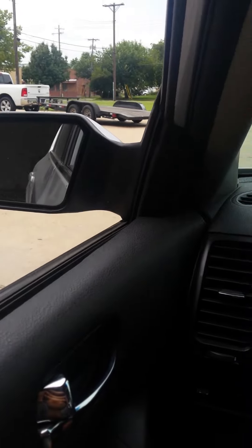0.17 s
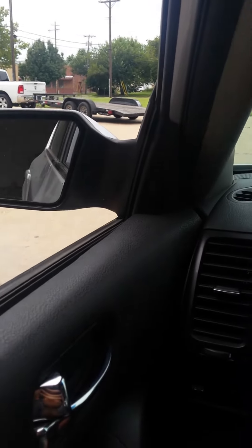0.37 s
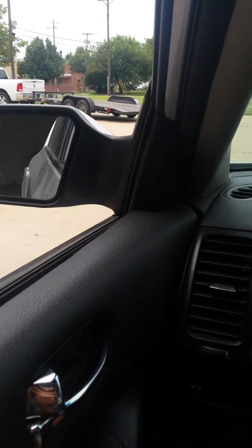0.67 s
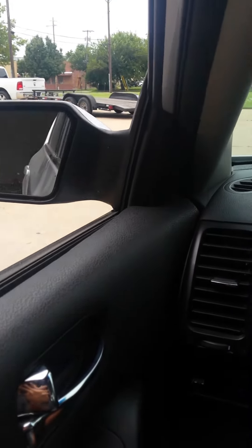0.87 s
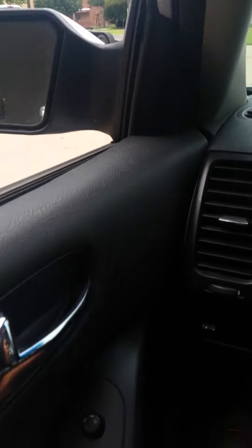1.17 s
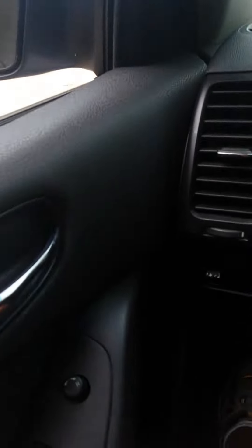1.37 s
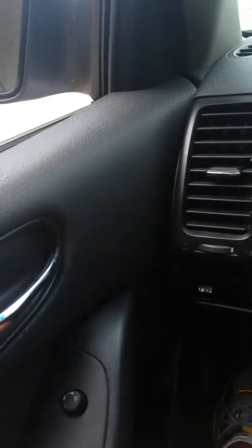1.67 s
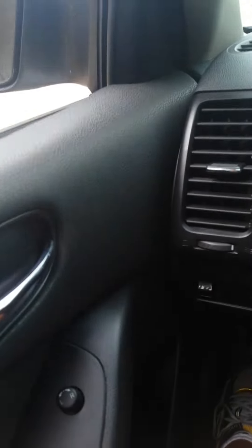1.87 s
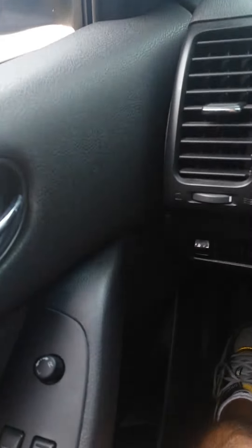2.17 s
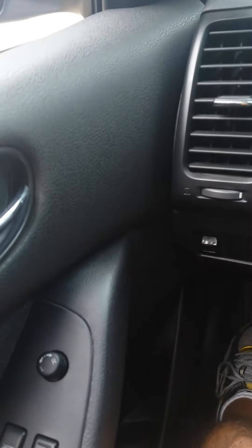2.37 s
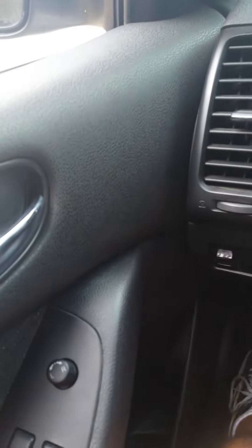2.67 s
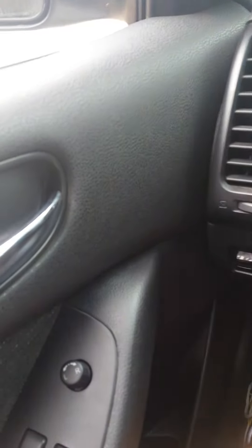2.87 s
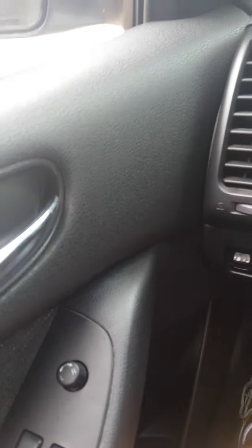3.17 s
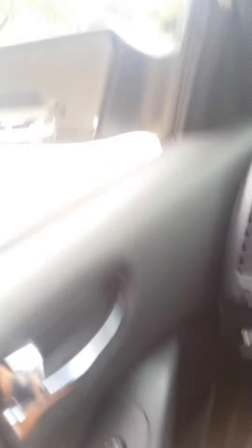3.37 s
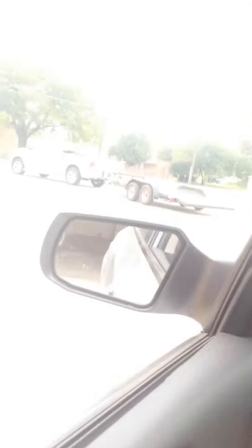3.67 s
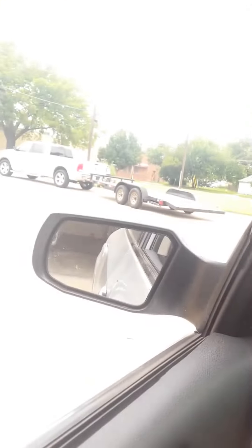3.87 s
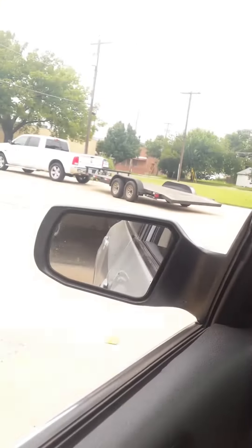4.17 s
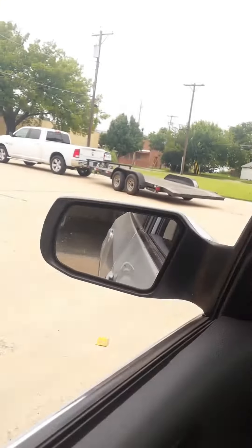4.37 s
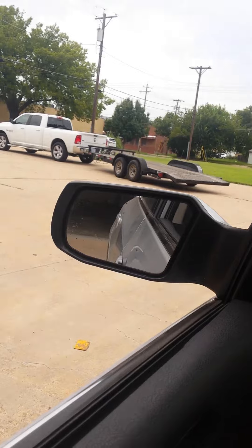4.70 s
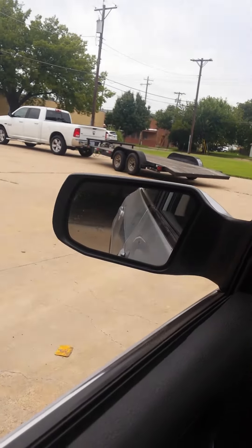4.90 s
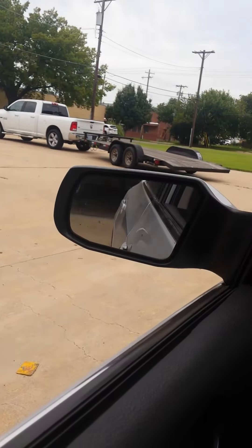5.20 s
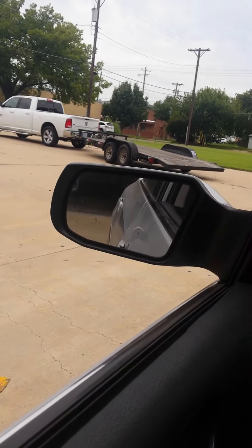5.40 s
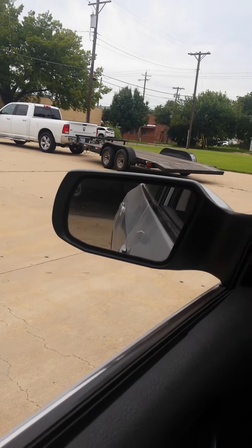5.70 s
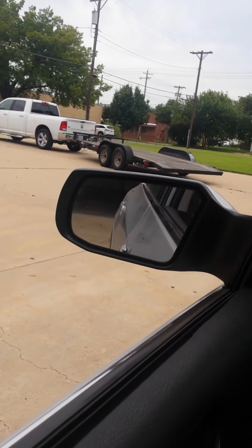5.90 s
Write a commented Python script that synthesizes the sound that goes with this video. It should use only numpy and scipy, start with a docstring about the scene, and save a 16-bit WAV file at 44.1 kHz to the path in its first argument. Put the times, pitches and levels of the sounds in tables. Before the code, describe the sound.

Inside a slowly rolling car by its open window, a low engine idle and dull tyre rumble run throughout with faint outside air. Two hard handling knocks come at once, close to the hand-held microphone, followed by small ticks. A tap, low thumps and stuttering brake chirps lead to a loud, thin, high squeal that pulses and wavers until the end.

```python
"""An engine idles and tyres rumble as a car creeps over concrete, heard from inside by the open window.
The hand-held phone knocks twice at the start and ticks now and then. Brakes chirp, low thumps pass, then two
discs squeal at close pitches, beating together and fading at each microphone port as the echoes shift.
Noise makes the rumble, hiss and scuffs; sine waves make the engine and brakes; fading rings make the knocks."""
import sys
import numpy as np
from scipy.fft import rfft, irfft, next_fast_len
from scipy.io import wavfile
from scipy.ndimage import map_coordinates

SR = 44100
rng = np.random.default_rng(int(sys.argv[2]) if len(sys.argv) > 2 else 0)


def unload_audio(sound):
    """Save the sound as a 16-bit wav file, at the path given as the first command line argument."""
    columns = np.transpose(np.atleast_2d(sound))
    # keep every value between -1 and 1, then stretch to whole-number steps
    steps = np.round(np.clip(columns, -1, 1) * 32767)
    wavfile.write(sys.argv[1], SR, steps.astype(np.int16))


N = 266584  # length in samples
TIME_S = np.arange(N) / SR


def amp(db):
    """Decibels to gain."""
    return 10 ** (np.asarray(db) / 20)


def unit(x):
    """Scale to rms 1."""
    return x / np.sqrt(np.mean(x ** 2) + 1e-20)


def along(points, hz):
    """Read a value between (Hz, value) points on a log frequency axis."""
    f, value = np.transpose(points)
    return np.interp(np.log(hz + 1), np.log(f + 1), value)


def curves(rows):
    """One value per sample for each column after the time."""
    s, *columns = np.transpose(rows)
    return [np.interp(TIME_S, s, column) for column in columns]


def wobble(rate):
    """A smooth random curve through `rate` random points a second."""
    points = rng.standard_normal(int(N * rate / SR) + 4)
    return map_coordinates(points, [np.arange(N) * rate / SR])


def wobbles(rate):
    """One random curve for each microphone port."""
    return np.array([wobble(rate), wobble(rate)])


def filtered(x, response):
    """Shape a sound by a gain (or complex gain) at each frequency."""
    m = next_fast_len(N + SR // 2)
    return irfft(rfft(x, m) * response(np.fft.rfftfreq(m, 1 / SR)), m)[..., :N]


def pan(db):
    """Left and right gains for a level difference."""
    return amp([[db / 2], [-db / 2]])


def cycle(hz):
    """Running phase of a pitch curve."""
    return 2 * np.pi * np.cumsum(hz) / SR


def swells(rows):
    """Bell-shaped swells of gain; length_s is the spread of each bell."""
    return sum(amp(db) * np.exp(-.5 * ((TIME_S - s) / length) ** 2) for s, db, length in rows)


# How alike noise is at the two ports: pitch_hz, likeness (1 = identical)
LIKENESS = [(40, .7), (150, .62), (600, .58), (1500, .35), (4000, .2), (12000, .1)]


def rush(spectrum):
    """Stereo noise of rms 1, more alike in the bass and more diffuse in the treble."""
    def mid_side_gains(hz):
        turn = np.arccos(np.clip(along(LIKENESS, hz), -1, 1)) / 2
        return amp(along(spectrum, hz)) * [np.cos(turn), np.sin(turn)]

    mid, side = filtered(rng.standard_normal((2, N)), mid_side_gains)
    return unit(np.array([mid + side, mid - side]))


# Engine over time: start_s, firing_rate_hz, level_db
ENGINE_IDLE = [(0, 26, -48), (.9, 30, -50), (1.25, 30, -49), (1.55, 26.2, -44), (2.3, 26.3, -42.5),
               (6.04, 26.4, -43.5)]
# Engine tones: multiple of the firing rate, relative_level_db
ENGINE_ORDERS = [(1, 0), (2, -3), (3, -8), (4, -5), (5, -1), (7, -10)]
# Steady tones of the fan and belt drive: pitch_hz, level_db
FAN_AND_BELT = [(380, -57.5), (984, -63.5), (1556, -89)]


def engine():
    """Multiples of the firing rate boom in the cabin; the fan and belts whine faintly."""
    hz, level_db = curves(ENGINE_IDLE)
    phase = cycle(hz + 0.16 * wobble(5.6))
    boom = 0
    for order, order_db in ENGINE_ORDERS:
        loudness = amp(level_db + order_db + 0.6 * wobble(3.1))
        start_phase = rng.uniform(0, 2 * np.pi)
        boom = boom + loudness * np.sin(order * phase + start_phase + 0.089 * wobbles(0.61))
    whine = 0
    for pitch_hz, whine_db in FAN_AND_BELT:
        tone = np.sin(cycle(pitch_hz * (1 + 0.004 * wobble(12))))
        whine = whine + amp(whine_db + 1.1 * wobbles(5.11)) * tone
    return np.sqrt(2) * (boom * pan(0.4) + whine)


# Tyre rumble over time: start_s, level_db
TYRE_LEVEL = [(0, -37), (1.3, -35.5), (1.7, -37), (2.3, -37.5), (2.85, -33.5), (3.2, -32), (3.5, -39),
              (4.2, -37), (6.04, -38.5)]
# Colour of the rumble: pitch_hz, relative_level_db (per Hz)
RUMBLE_COLOUR = [(20, -25), (40, -20), (52, -3), (70, -5.5), (95, 2.5), (120, -3), (190, -0.5), (240, -5),
                 (300, -4.5), (420, -14.5), (600, -16.5), (1000, -56.5), (2000, -26), (4000, -85)]
# Outside air, louder as the phone turns to the window: start_s, level_db
WINDOW_LEVEL = [(0, -43), (1.2, -43.5), (2.3, -44), (3.2, -44.5), (3.8, -42.5), (6.04, -42.5)]
# Colour of the outside air: pitch_hz, relative_level_db (per Hz)
AIR_COLOUR = [(200, -11.5), (450, -2), (700, -3), (1000, -7), (1500, -8.5), (2000, -16.5), (2600, -17),
              (4000, -20.5), (6500, -24.5), (9000, -25.5), (12000, -29.5), (14400, -29), (15600, -31)]


def road():
    """Tyres rumble through the car body as low noise; outside air hisses in at the window."""
    rumble = amp(curves(TYRE_LEVEL)[0] + 1.5 * wobble(17)) * rush(RUMBLE_COLOUR)
    air = amp(curves(WINDOW_LEVEL)[0]) * rush(AIR_COLOUR)
    return rumble + air


# The phone shifts in the hand: start_s, scuff_db, thud_db, scuff_t60_s (time for the scuff to fade 60 dB).
# Levels are before the slow rise, the chatter and the left-right balance.
GRIP_SHIFTS = [(0.078, -36.5, -54, .1), (0.083, -27, -21.5, 0.11), (0.0875, -17.5, -28.5, .03),
               (0.092, -16.5, -18, 0.057), (0.127, -41, -30, .06), (.153, -31, -24.5, 0.1),
               (.157, -22.5, -17.5, 0.074), (.167, -32, -18, 0.077), (0.188, -35, -18.5, 0.06),
               (.194, -36.5, -33, 0.06), (.468, -40, -59, 0.075), (1.34, -49, -57, .04),
               (1.81, -39, -53, 0.065), (2.24, -25, -27.5, 0.016), (4.287, -42, -56, .03)]
# Colour of the scuff: pitch_hz, relative_level_db (per Hz)
SCUFF_COLOUR = [(150, 10.5), (500, 3.5), (900, -3), (1700, 5), (2800, 0.5), (4200, 4), (6400, 3.5),
                (9000, -1), (13500, -13), (16000, -37)]
# Low tones of the thud: pitch_hz, relative_level_db, t60_s
THUD_TONES = [(122.4, 1.5, 0.14), (172.5, -1, 0.14), (236, -3.5, 0.068)]
# Ringing of the shell: pitch_hz, relative_level_db, t60_s when free
SHELL_TONES = [(844, -19, 0.055), (1347, 0, 0.074), (1547, 1, 0.078), (1960, -1.5, 0.052), (2790, -5, 0.1),
               (4350, -8, .08), (6130, 4, 0.065), (7130, -3, 0.055)]
CLACK_DB, FREE_RING_S = -12, 0.063  # level beside the scuff; in briefer contacts the finger damps the shell
CHATTER_DB, CHATTER_RATE = 3, 900  # loose case parts chatter: depth in dB, random points a second


def knocks():
    """Each shift of the grip scuffs the case, clacks its shell and thuds in it."""
    scuff, thud, clack = np.zeros(N), np.zeros(N), np.zeros(N)
    t = np.arange(SR // 4) / SR
    rise = 1 - np.exp(-t / 0.002)
    for s, scuff_db, thud_db, t60 in GRIP_SHIFTS:
        span = slice(round(s * SR), round(s * SR) + len(t))
        scuff[span] += rise * amp(scuff_db - 60 * t / t60)
        for hz, db, life in THUD_TONES:
            thud[span] += rise * amp(thud_db + db - 60 * t / life) * np.sin(2 * np.pi * hz * t)
        damped = min(t60 / FREE_RING_S, 1)
        for hz, db, life in SHELL_TONES:
            ring_db = scuff_db + CLACK_DB + db + rng.normal(0, 2.2) - 60 * t / (life * damped)
            clack[span] += rise * amp(ring_db) * np.sin(2 * np.pi * (hz * t + rng.random()))
    chatter = unit(amp(CHATTER_DB * wobble(CHATTER_RATE)))
    return (scuff * chatter * rush(SCUFF_COLOUR) + clack) * pan(6.2) + thud * pan(-0.49)


# Sharp ticks of the case: start_s, level_db (before a 12 dB lift and the case), left_minus_right_db
CASE_TICKS = [(0.0891, -1.5, 3.5), (.3691, -41, -1), (0.4716, -33, 15), (.475, -32, 4), (0.522, -36, 2),
              (0.839, -41, -7), (1.816, -36, -1), (2.034, -35.5, 3), (2.2404, -47, 2), (2.242, -15, 13)]
# Resonances of the plastic case: pitch_hz, width_hz, level_db
CASE_RESONANCES = [(810, 350, -14), (2470, 4500, -10.5), (6170, 990, 4), (11200, 2200, -15)]


def ticks(t60=0.0075, rattle_db=-9):
    """Tiny snaps, each with a brief noisy rattle, ring the resonances of the plastic case."""
    snaps, t = np.zeros((2, N)), np.arange(SR // 20) / SR
    for s, db, side_db in CASE_TICKS:
        snap = (t == 0) + amp(rattle_db - 60 * t / t60) * rng.standard_normal((2, len(t)))
        snaps[:, round(s * SR):][:, :len(t)] += amp(db + 12.0) * pan(side_db) * snap

    def case(f):
        peaks = sum(amp(db) * 1j * f * width / (centre ** 2 - f ** 2 + 1j * f * width)
                    for centre, width, db in CASE_RESONANCES)
        return peaks / (1 + (f / 13500) ** 8)  # dull the extreme treble

    return filtered(snaps, case)


def squeal(hz, jitter_hz, wander_hz):
    """Phase of a disc kept ringing by its pad's stick-slip; the uneven disc face shakes the pitch."""
    return cycle(hz + wander_hz * wobble(12) + jitter_hz * wobble(170))


def arch(start, end):
    """Gain of a rounded swell between two sharp nulls."""
    u = np.clip((TIME_S - start) / (end - start), 0, 1)
    return 4 * u * (1 - u)


def arches(rows):
    """The loudest swell at each moment, from start_s, end_s, level_db rows."""
    return np.max([amp(db) * arch(start, end) for start, end, db in rows], axis=0)


def at_ports(phase, lag, side_db, flutter_db):
    """A fluttering tone of rms about 1 with a lag (radians) and a level difference between the ports."""
    ports = amp([side_db / 2, -side_db / 2])
    balance = ports / np.sqrt(np.mean(ports ** 2, 0))
    tone = np.sin(phase + np.array([lag, -lag]) / 2)
    return np.sqrt(2) * amp(flutter_db * wobble(130)) * balance * tone


# Short chirps as the pads first touch: start_s, end_s, pitch_hz, level_db, octave_db (beside the note)
PAD_CHIRPS = [(1.028, 1.068, 1870, -42, -22), (1.055, 1.14, 1872, -52, -20), (2.715, 2.757, 1950, -45, -16),
              (2.747, 2.776, 1962, -38.5, -17), (2.774, 2.81, 1978, -36.5, -17),
              (2.81, 2.866, 1990, -36.5, -17), (2.867, 2.9, 1980, -44, -15), (2.9, 2.938, 1980, -43, -24),
              (2.94, 3.0, 1982, -46.5, -28), (2.99, 3.1, 1985, -48.5, -22), (3.14, 3.24, 1980, -53, -22)]


def chirps(lean_db=-1, drift_db=2):
    """A pad grazes its disc in a stutter of short notes, each with a fainter octave."""
    hz = curves([((start + end) / 2, pitch) for start, end, pitch, _, _ in PAD_CHIRPS])[0]
    phase = squeal(hz, jitter_hz=9, wander_hz=2)
    note = arches([(start, end, db) for start, end, _, db, _ in PAD_CHIRPS])
    octave = arches([(start, end, db + octave_db) for start, end, _, db, octave_db in PAD_CHIRPS])
    sound = 0
    for order, gain in ((1, note), (2, octave)):
        side_db = lean_db + drift_db * wobble(12)
        sound = sound + gain * at_ports(order * phase, .6 * wobble(7), side_db, flutter_db=1.2)
    return sound


# Gentle scrapes of the grip: centre_s, level_db, length_s
GRIP_RUBS = [(1.32, -55, 0.011), (1.344, -41.5, 0.0014), (1.37, -54.5, 0.034), (1.815, -43.5, 0.0026)]
# Colour of the scrapes: pitch_hz, relative_level_db (per Hz)
RUB_COLOUR = [(3000, -23), (9500, -16), (11600, -11), (13500, -21), (16000, -45.5)]


def rubs():
    """The grip scrapes gently: bright noise in short swells."""
    return swells(GRIP_RUBS) * rush(RUB_COLOUR)


# A firmer tap on the phone: start_s, level_db
FIRM_TAP = (2.2405, -33.5)
# Ringing of the phone's body: pitch_hz, relative_level_db, t60_s
BODY_TONES = [(660, 2, .04), (880, -6.5, .03), (970, 1.5, 0.039), (1550, -2, .025)]


def tap():
    """A fingertip lands on the phone and its body rings briefly."""
    s, tap_db = FIRM_TAP
    t = np.maximum(TIME_S - s, 0)
    return sum(amp(tap_db + db - 60 * t / t60) * np.sin(2 * np.pi * hz * t) for hz, db, t60 in BODY_TONES)


# Low thumps: centre_s, level_db (before the low-pass and the lean to the right), length_s
LOW_THUMPS = [(2.39, -34.5, 0.014), (2.475, -31, 0.016), (2.545, -29, 0.014), (2.755, -26, 0.03),
              (2.845, -28, 0.021), (2.905, -29, 0.023)]


def thumps():
    """A run of low thumps, mostly at the right port: rumble noise with its treble removed."""
    low_noise = filtered(rush(RUMBLE_COLOUR), lambda hz: 1 / (1 + (hz / 250) ** 4))
    return swells(LOW_THUMPS) * low_noise * pan(-20.5)


def echoed(phase, rate, direct):
    """A tone of rms about 1/sqrt(2), arriving directly and by shifting echoes, so it fades at each port."""
    in_step = (direct + wobbles(rate)) * np.sin(phase)
    out_of_step = wobbles(rate) * np.cos(phase)
    return (in_step + out_of_step) / np.sqrt(direct ** 2 + 2)


# A second brake, a little higher, that lets go again: start_s, pitch_hz
SECOND_GLIDE = [(2.95, 2060), (3.1, 2066), (3.28, 2092), (3.38, 2106), (3.46, 2133), (3.6, 2134),
                (3.73, 2127), (4.2, 2133), (4.46, 2131), (4.62, 2110), (4.85, 2132), (5.0, 2134),
                (5.2, 2160), (5.6, 2152)]
# Its strength before small trims: start_s, note_db, octave_db, left_minus_right_db
SECOND_STRENGTH = [(2.88, -66, -80, 3), (2.95, -50, -75, 3), (3.02, -45, -74, 1), (3.11, -52, -76, 1),
                   (3.15, -48, -76, 1), (3.27, -49, -74, 1), (3.35, -52, -74, 3), (3.42, -51, -70, 5),
                   (3.5, -33, -59, 7), (3.58, -29.5, -57, 7), (3.64, -35, -53, 7), (3.75, -35.5, -48, 7),
                   (3.85, -31.5, -53, 8), (3.92, -37, -53, 4), (3.97, -32, -53, 10), (4.08, -41, -54, 3),
                   (4.16, -32.5, -51, 3), (4.31, -43, -52, 1), (4.4, -39, -51, 1), (4.5, -35.5, -48, -2),
                   (4.6, -41, -50, 0), (4.74, -41, -59, 1), (4.82, -35, -53, 7), (4.93, -31.5, -56, 8),
                   (5.0, -36, -54, 3), (5.1, -32, -51, 4), (5.22, -38, -48.5, 0), (5.3, -41, -53, 0),
                   (5.38, -52, -58, 0), (5.45, -48, -55, -5), (5.55, -56, -64, 0), (6.04, -68, -72, 0)]
SECOND_THIRD_DB = -5.5  # its third harmonic beside its octave


def second_brake(note_db=-1.96, bright_db=-1):
    """A disc glides up to roughly 60 Hz above the main one, beats with it and fades."""
    hz = curves(SECOND_GLIDE)[0]
    level_db, octave_db, side_db = curves(SECOND_STRENGTH)
    phase = squeal(hz, jitter_hz=4, wander_hz=1.2)
    loudness = amp(level_db + note_db + 1.9 * wobble(30))
    note = loudness * at_ports(phase, .8 * wobble(14), side_db + 4 * wobble(26), flutter_db=.5)
    octave = echoed(2 * phase, rate=26, direct=1.1)
    third = amp(SECOND_THIRD_DB) * echoed(3 * phase, rate=26, direct=1.5)
    upper = np.sqrt(2) * (octave + third)
    started = TIME_S > SECOND_STRENGTH[0][0]
    return (note + amp(octave_db + bright_db) * upper) * started


# Highest overtones of a singing disc: multiple of the note, relative_level_db, left_minus_right_db
DISC_OVERTONES = [(4, 0.5, -5), (5, -2, -7), (6, -11, -3)]
GRAIN_DB = 2.0  # depth of their grain


def overtones(phase):
    """The upper overtones are grainy; shorter waves fade faster as the car moves."""
    sound = 0
    for order, db, lean_db in DISC_OVERTONES:
        grainy = amp(db + GRAIN_DB * wobble(190))
        sound = sound + grainy * pan(lean_db) * echoed(order * phase, rate=9 * order, direct=.6)
    return np.sqrt(2) * sound


# The brake that keeps singing: start_s, pitch_hz
MAIN_GLIDE = [(3.45, 2067), (3.7, 2065), (3.95, 2071), (4.25, 2065), (4.62, 2066), (5.0, 2074), (5.4, 2078),
              (5.56, 2071), (5.75, 2080), (5.9, 2072), (6.04, 2072)]
# Echoes also turn the note between the ports: start_s, right_port_lag_radians
PORT_TURN = [(3.6, .5), (3.66, 3.5), (3.79, 2.7), (3.84, .9), (4.03, .3), (4.07, 2.2), (4.12, 2.3),
             (4.138, 3), (4.17, -.9), (4.28, .1), (4.35, -1.4), (4.43, -.2), (4.48, 2.7), (4.56, .3),
             (4.7, -.9), (4.79, -1), (4.83, -3), (4.86, 0), (4.96, .6), (5.55, -.3), (6.0, .5)]
# Swells between the nulls where echoes cancel the note, before small trims: start_s, end_s, level_db
LEFT_NOTE = [(3.45, 3.68, -26.5), (3.68, 3.8, -33), (3.76, 3.9, -23.5), (3.89, 4.03, -22.5),
             (4.04, 4.297, -19), (4.293, 4.45, -23), (4.45, 4.6, -19), (4.56, 4.645, -23.5),
             (4.645, 4.72, -22.5), (4.73, 4.775, -33), (4.8, 4.87, -29), (4.84, 4.937, -16.5),
             (4.937, 5.04, -22.5), (5.04, 5.175, -25), (5.185, 5.257, -22), (5.257, 5.42, -23.5),
             (5.4, 5.51, -35), (5.505, 5.615, -22), (5.612, 5.76, -24.5), (5.73, 5.937, -22.5),
             (5.935, 6.018, -28), (6.012, 6.12, -25)]
RIGHT_NOTE = [(3.45, 3.63, -29.5), (3.61, 3.69, -37), (3.695, 3.815, -23), (3.815, 3.94, -28.5),
              (3.92, 4.1, -26), (4.01, 4.165, -22), (4.14, 4.33, -23), (4.34, 4.49, -20), (4.47, 4.57, -28),
              (4.565, 4.672, -21.5), (4.668, 4.73, -28), (4.745, 4.835, -25.5), (4.84, 5.0, -22.5),
              (4.98, 5.055, -27), (5.05, 5.17, -27), (5.19, 5.275, -22.5), (5.27, 5.43, -27.5),
              (5.435, 5.53, -34), (5.5, 5.635, -22.5), (5.64, 5.81, -25), (5.77, 5.935, -25),
              (5.925, 6.018, -28.5), (6.012, 6.12, -26)]
# The octave's own swells and nulls at each port: start_s, end_s, level_db
LEFT_UPPER = [(3.57, 3.68, -47), (3.67, 3.83, -46), (3.85, 4.01, -45.5), (4.01, 4.095, -42),
              (4.095, 4.19, -40), (4.19, 4.305, -42), (4.33, 4.42, -46), (4.42, 4.665, -44),
              (4.665, 4.815, -39), (4.815, 4.89, -40.5), (4.89, 4.95, -42.5), (4.95, 5.01, -43),
              (5.0, 5.18, -41), (5.18, 5.29, -44), (5.33, 5.4, -50), (5.41, 5.53, -37.5), (5.53, 5.62, -41),
              (5.63, 5.7, -45), (5.73, 5.99, -37.5), (5.99, 6.1, -48)]
RIGHT_UPPER = [(3.53, 3.71, -41.5), (3.69, 3.82, -37.5), (3.81, 3.9, -43), (3.88, 3.995, -39),
               (3.995, 4.09, -34), (4.09, 4.2, -37), (4.195, 4.29, -37), (4.28, 4.375, -38),
               (4.365, 4.465, -37), (4.455, 4.57, -38.5), (4.55, 4.71, -38.5), (4.71, 4.82, -39),
               (4.82, 4.945, -35.5), (4.94, 5.05, -41.5), (5.05, 5.2, -39), (5.17, 5.29, -38.5),
               (5.3, 5.375, -42), (5.38, 5.53, -38), (5.52, 5.62, -39), (5.62, 5.71, -37.5),
               (5.73, 5.88, -39), (5.8, 6.0, -32), (6.0, 6.1, -37)]
# Swells of the third harmonic, shared by both ports: start_s, end_s, level_db
THIRD_HARMONIC = [(3.53, 3.78, -53.5), (3.78, 3.87, -50), (3.86, 3.95, -52), (3.95, 4.13, -51.5),
                  (4.14, 4.29, -48.5), (4.29, 4.5, -50.5), (4.52, 4.61, -51), (4.61, 4.84, -47),
                  (4.84, 4.93, -50), (4.92, 5.08, -49), (5.07, 5.18, -52), (5.18, 5.29, -53),
                  (5.28, 5.44, -57), (5.44, 5.53, -49), (5.53, 5.61, -53), (5.61, 5.7, -56),
                  (5.7, 5.84, -56), (5.83, 5.98, -47), (5.98, 6.09, -51)]
# Harder slips put more into the highest overtones: start_s, level_db
SLIP_EDGE = [(3.5, -64), (3.7, -60), (4.3, -62), (4.5, -60.5), (4.9, -63), (5.15, -60), (5.28, -62),
             (5.36, -68), (5.48, -60), (5.6, -63), (5.74, -69), (5.86, -59), (6.04, -61)]
MAIN_START_S, MAIN_ATTACK_S = 3.45, .05  # fade-in of the highest overtones
ROUGH_DB, ROUGH_PATCHY_DB = .45, 4  # pad slips roughen the note in bursts: flutter depth, patchiness
OCTAVE_FLUTTER_DB = 1.5


def main_brake(note_db=0.17, octave_db=0.4, third_db=1.3, upper_db=-1.7):
    """One disc catches and holds its note, which swells and cancels at each port several times a second."""
    phase = squeal(curves(MAIN_GLIDE)[0], jitter_hz=2, wander_hz=1)
    lag = curves(PORT_TURN)[0]
    level_sides = np.zeros(N)

    roughness_db = ROUGH_DB * amp(ROUGH_PATCHY_DB * wobble(8))
    note = np.array([arches(LEFT_NOTE), arches(RIGHT_NOTE)])
    note = note * at_ports(phase, lag, level_sides, flutter_db=roughness_db)

    octave = np.array([arches(LEFT_UPPER), arches(RIGHT_UPPER)]) * amp(OCTAVE_FLUTTER_DB * wobble(45))
    octave_phase = 2 * phase + .3 * wobble(30)
    octave = octave * at_ports(octave_phase, 1.45 + .5 * wobble(14), level_sides, flutter_db=.9)

    third_phase = 3 * phase + .4 * wobble(30)
    third = at_ports(third_phase, 1 + .6 * wobble(14), -1 + 4 * wobble(22), flutter_db=1.2)
    third = arches(THIRD_HARMONIC) * third

    caught = np.clip((TIME_S - MAIN_START_S) / MAIN_ATTACK_S, 0, 1)
    upper = caught * amp(upper_db + curves(SLIP_EDGE)[0]) * overtones(phase)
    return amp(note_db) * note + amp(octave_db) * octave + amp(third_db) * third + upper


PORT_LAG_S = .00013  # road sound reaches the left port this much later


def scene():
    """Everything that reaches the two ports; road noise meets the right one first."""
    def port_delay(hz):
        return np.exp(np.pi * hz * PORT_LAG_S * np.array([[-1j], [1j]]))

    outside = filtered(road() + thumps(), port_delay)
    phone = knocks() + ticks() + rubs() + tap()
    brakes = chirps() + second_brake() + main_brake()
    return engine() + outside + phone + brakes


# The left port is duller in the top octave: pitch_hz, left_minus_right_db
PORT_TREBLE = [(6500, 0), (8200, -8), (11000, -7), (14000, -3)]
TOP_HZ = 15650  # nothing is kept above this


def record(dry, ceiling=0.51):
    """The ports differ in the treble; the phone rounds off high peaks and cuts the extreme treble."""
    heard = filtered(dry, lambda hz: amp(along(PORT_TREBLE, hz) * np.array([[.5], [-.5]])))
    rounded = heard / (1 + np.abs(heard / ceiling) ** 6) ** (1 / 6)
    return filtered(rounded, lambda hz: (hz < TOP_HZ) / np.sqrt(1 + (hz / 15000) ** 40))


dry = scene()
out = record(dry)
unload_audio(out)
```